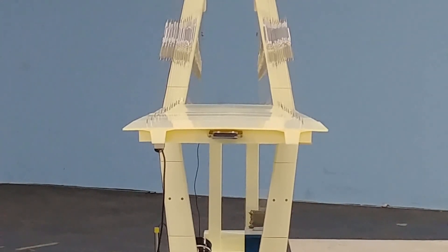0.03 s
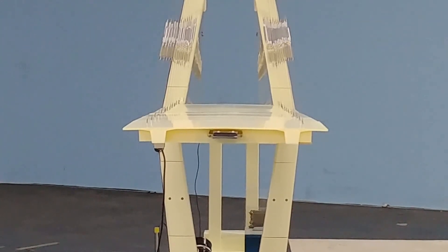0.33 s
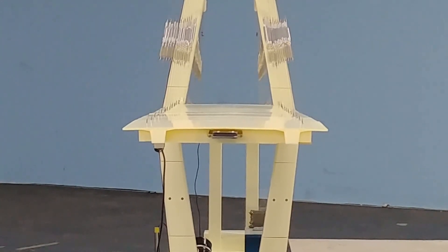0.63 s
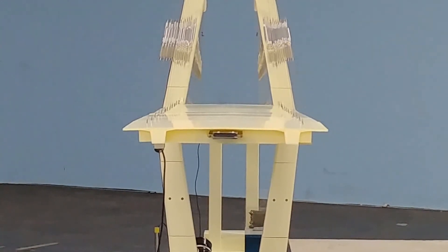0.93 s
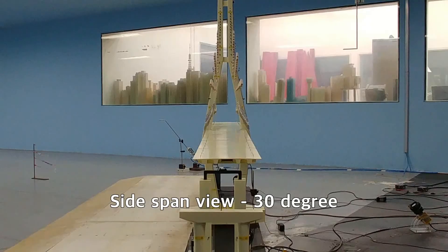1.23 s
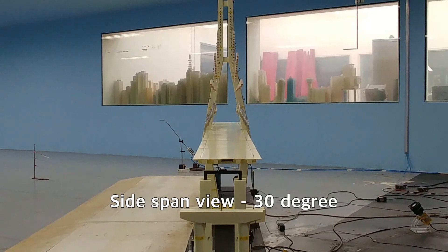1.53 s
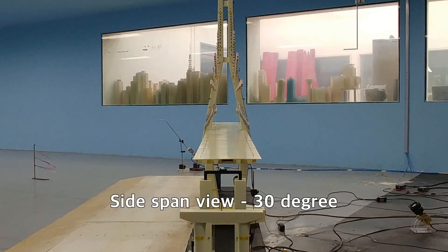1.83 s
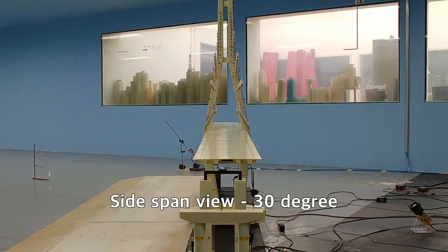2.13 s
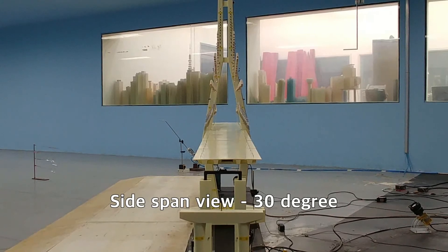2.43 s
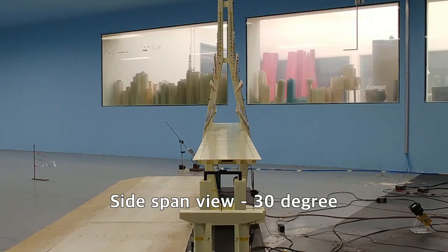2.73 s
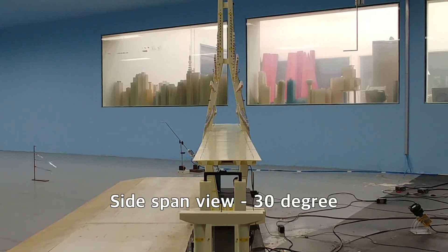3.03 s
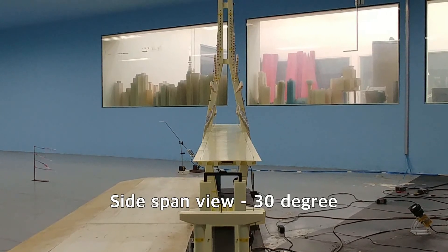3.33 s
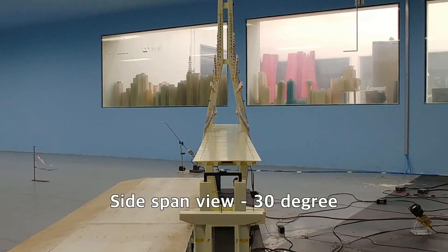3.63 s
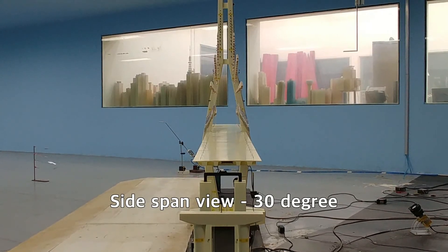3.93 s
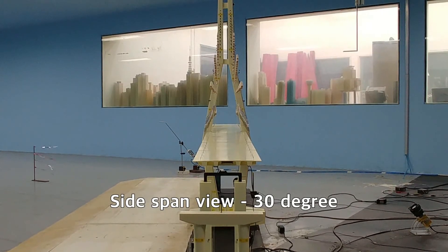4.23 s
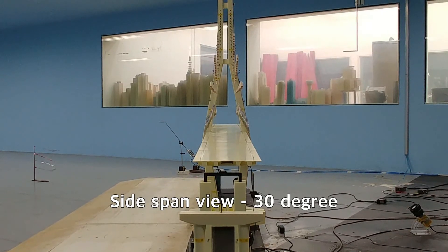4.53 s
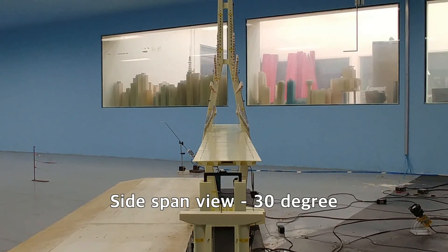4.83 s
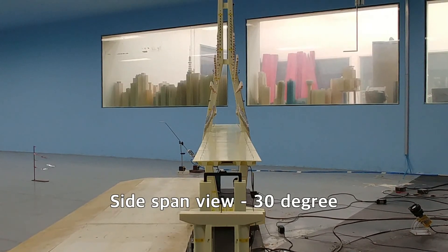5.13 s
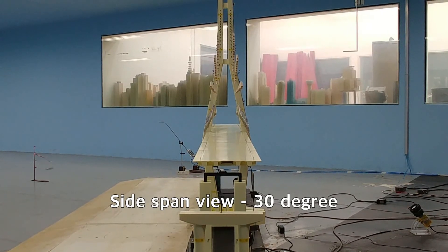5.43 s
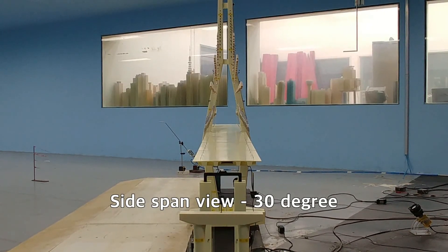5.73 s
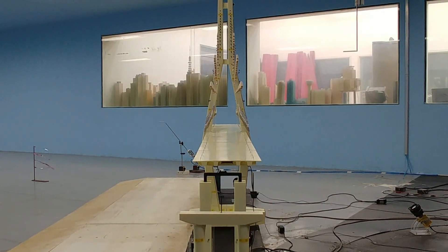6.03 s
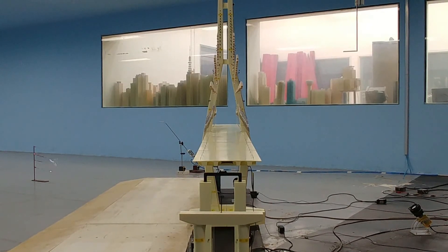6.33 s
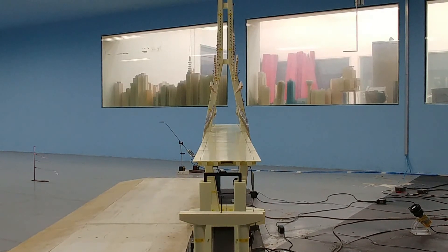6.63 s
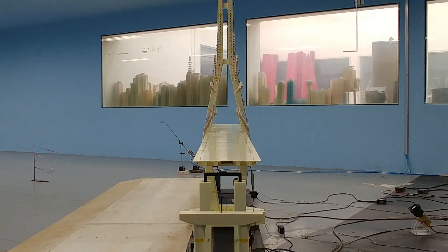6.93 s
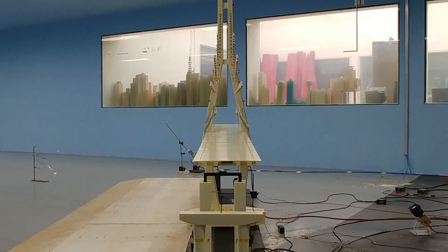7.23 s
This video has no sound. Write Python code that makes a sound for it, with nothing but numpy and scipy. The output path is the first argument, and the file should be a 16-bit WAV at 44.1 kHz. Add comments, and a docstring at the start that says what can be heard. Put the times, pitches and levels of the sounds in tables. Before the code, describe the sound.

Low, heavy airflow and pulsing fan tones fill a test room, break off with ticks, then return and run on steadily.

```python
"""A wind tunnel roars steadily in a large test room as swirling air rings its duct and hisses.
Two groups of fans hum at slightly different speeds, so their tones throb; the motor drive whines faintly.
A two-sided microphone listens from a first place, where the sound breaks off twice with a tick,
then fades in at a second place with the airflow arriving from the other side."""
import sys
import numpy as np
from scipy import signal
from scipy.fft import rfft, irfft
from scipy.io import wavfile
from scipy.ndimage import uniform_filter1d, minimum_filter1d

SR = 44100
rng = np.random.default_rng(int(sys.argv[2]) if len(sys.argv) > 2 else 0)


def waveform_to_disk(signal):
    """Save audio, clipped to [-1, 1], as 16-bit WAV at the path in sys.argv[1]."""
    frames = np.transpose(np.atleast_2d(signal))
    scaled = np.clip(frames, -1, 1) * 32767
    samples = np.round(scaled).astype(np.int16)
    wavfile.write(sys.argv[1], SR, samples)


N = 325899
TIME = np.arange(N) / SR
HZ = np.fft.rfftfreq(N, 1 / SR)

# roar of the swirling air: (frequency [Hz], relative level [dB])
ROAR = [(35, -66), (49, -49.5), (60, -36.5), (100, -33.5), (140, -34), (165, -37.5), (220, -38.5),
        (280, -41.5), (350, -43.5), (600, -47), (900, -50.5), (1250, -56), (1800, -60.5), (2300, -67),
        (2850, -71), (3400, -77.5)]
# tone of the high hiss, with a narrow gap near 10.8 kHz: (frequency [Hz], relative level [dB])
HISS = [(4700, -79.5), (5200, -79.5), (6100, -82), (6900, -90.5), (7700, -86), (8400, -91.5), (9000, -99.7),
        (10000, -103.2), (10800, -118.1), (13000, -107.1), (15500, -103.7)]
# notes at which the air in the duct and room rings: (frequency [Hz], width [Hz], lift [dB])
DUCT_RINGS = [(66.2, 2.5, 7.5), (183.7, 5, 5), (236, 14, 2), (304.8, 2, 7), (580, 30, 2.8), (820, 120, 1),
              (1850, 300, 1.5)]
# swells of the hiss: (time [s], half-length [s], lift of the hiss [dB], lift of its high fizz [dB])
HISS_SWELLS = [(1.89, .06, 3, 1.2), (2.84, .035, -1, 7), (3.11, .065, 1.5, 2.6), (3.35, .06, 1.7, 2.2),
               (3.61, .05, 0.5, 6), (3.87, .08, 1.3, 3), (4.81, .06, 2, .6), (6.11, .045, 2, .6),
               (6.2, .45, .6, 1.5)]
# sound that comes straight down the tunnel, not from all around: (frequency [Hz], share [0-1])
DIRECT_SHARE = [(60, 0.07), (300, .45), (700, 0.79), (1600, 0.25), (2500, 0.04), (6000, 0.1)]
# how alike the rest is on both sides, lowered by swirls at each: (frequency [Hz], likeness [0-1])
ROOM_LIKENESS = [(60, .76), (110, 0.66), (220, 1), (600, 0.7)]
# tones of each fan group: (multiple of the blade rate, base level at first place [dB], at second [dB])
FAST_FAN_TONES = [(1, -25.5, -24.6), (2, -23.5, -22.3), (4, -30.5, -23.1), (5, -23.5, -25.7),
                  (6, -36, -28.6), (7, -44, -41.5), (8, -42, -35.2), (9, -35, -33.8), (10, -32.5, -32),
                  (11, -44, -36.4), (12, -45, -34.8), (13, -44, -43.5), (14, -50, -41.2), (15, -49, -43)]
SLOW_FAN_TONES = [(4, -29, -25.5), (5, -26.5, -37.5), (6, -35, -30.2), (7, -37, -39.5), (12, -46, -46.1)]
# rise and fall of the drone, the fans' tone at four times the blade rate: (time [s], lift [dB])
DRONE_LIFT = [(1.6, 4), (2.3, -1.5), (2.8, 0.5), (3.1, -7.5), (3.58, -2), (3.82, -9), (4.2, -8.5),
              (4.4, 1.5), (4.9, -4), (5.15, 1), (5.5, 3), (5.8, 3.5), (6.1, 5.5), (6.28, -7), (6.5, 5.5),
              (6.9, -4.5), (7.15, 1.5), (7.35, -5)]
# whine of the motor drive and its two side tones: (frequency [Hz], base level [dB])
WHINE_TONES = [(4951, -72), (4984, -66.5), (5050, -74)]
# tone and left-right balance of the scene's two parts; the first one's hiss dips near 9 kHz:
# (frequency [Hz], lift in first [dB], left minus right in first [dB], left minus right in second [dB])
SHAPING = [(65, -1.3, 4.5, 1.2), (130, 0.4, 1.8, 0.7), (250, -1, 3.2, 1.6), (500, -0.1, 2.7, 1.2),
           (1000, 0.3, 3.2, 0.5), (1700, 0.2, 2.5, -1.0), (2900, 2.7, 3.5, 1.7), (4600, 4.2, 3.2, -0.5),
           (5900, 1.5, 0.6, -4.5), (7700, 6.7, 11.8, 4.0), (8400, 4.5, 10, 2.6), (9300, -8, 10, 0.8),
           (10000, 0, 9, 0.5)]
# stretches heard from the first place: (start [s], stop [s])
FIRST_SPANS = [(0, .9152), (1.0527, 1.1437)]
# brief swells of the deep rumble: (time [s], half-length [s], lift [dB])
RUMBLE_SWELLS = [(1.76, 0.04, 2.5), (2.28, 0.061, 3), (2.89, 0.043, 4), (6.23, 0.045, 1.5),
                 (6.89, 0.037, 2.5)]
# slow dips and swells of the roar's body, just above the rumble: (time [s], half-length [s], lift [dB])
BODY_SWELLS = [(3.2, .4, -0.4), (4.9, 0.49, 1.5), (6.5, 0.27, -1.2)]

RUMBLE_TO_HZ, RUSH_FROM_HZ, HISS_FROM_HZ = 115, 460, 2400
SECOND_START_S = 1.2858


def from_db(db):
    """Turn decibels into a number to multiply the sound by."""
    return 10 ** (np.asarray(db) / 20)


def curve(table, column=1):
    """Join the points of one table column into a value for every frequency."""
    rows = np.asarray(table, float)
    return np.interp(np.log(HZ + 1), np.log(rows[:, 0] + 1), rows[:, column])


def below(edge_hz, order=4):
    """A soft filter: how much of each frequency to keep so that mostly the lows remain."""
    return 1 / (1 + (HZ / edge_hz) ** order)


def drift(rate_hz):
    """A random wobble, about 1 in size, that moves mostly slower than rate_hz."""
    times = np.arange(0, TIME[-1] + 1, 1 / 200)
    hz = np.fft.rfftfreq(len(times), times[1])
    noise = rfft(rng.standard_normal(len(times))) * (hz > 0)
    slow = irfft(noise / (1 + (hz / rate_hz) ** 2), len(times))
    return np.interp(TIME, times, slow / slow.std())


def swells(table, column=2):
    """A level in dB with one smooth bump or dip for each table row."""
    return sum(row[column] * np.exp(-((TIME - row[0]) / row[1]) ** 2) for row in table)


def air_noise(lead_ms, spacing_m=0.15, sound_m_per_s=343):
    """Left and right noise spectra: part reaches the left lead_ms early, part comes from all around."""
    left, unrelated = (rfft(rng.standard_normal(N)) * np.sqrt(SR / 2) for _ in range(2))
    direct = np.clip(curve(DIRECT_SHARE), 0, 1)
    room = np.clip(curve(ROOM_LIKENESS), 0, 1) * np.sinc(2 * HZ * spacing_m / sound_m_per_s)
    delay = np.exp(-2j * np.pi * HZ * lead_ms / 1000)
    alike = direct * delay + (1 - direct) * room
    right = alike * left + np.sqrt(np.maximum(1 - abs(alike) ** 2, 0)) * unrelated
    return np.array([left, right])


def airflow(lead_ms):
    """Swirling air roars and rings the duct; its hiss flutters and swells now and then."""
    colour = from_db(curve(list(ROAR) + list(HISS)))
    for ring_hz, width_hz, lift_db in DUCT_RINGS:
        peak = 1 / (1 + (2 * (HZ - ring_hz) / width_hz) ** 2)
        colour *= np.sqrt(1 + (from_db(lift_db) ** 2 - 1) * peak)
    air = air_noise(lead_ms) * colour
    low = below(HISS_FROM_HZ)
    high = np.exp(-((HZ - 7800) / 900) ** 2)
    roar, hiss, fizz = (irfft(air * band, N) for band in (low, 1 - low - high, high))
    swirls = drift(12)
    hiss_db = swells(HISS_SWELLS, column=2) + 0.94 * swirls
    fizz_db = swells(HISS_SWELLS, column=3) + 0.8 * swirls
    return roar + hiss * from_db(hiss_db) + fizz * from_db(fizz_db)


def opening_gust(air, lift_db=3, fade_s=0.42, top_hz=500):
    """A gust lifts the low roar at the start and dies away."""
    gain = from_db(lift_db * np.exp(-(TIME / fade_s) ** 2))
    low_roar = irfft(rfft(air) * below(top_hz), N)
    return air + (gain - 1) * low_roar


def wavering_tone(cycles, level_db, scatter):
    """A tone heard through moving air: a steady part plus a wavering echo, a bit different on each side."""
    echo = drift(1.8) + 1j * drift(1.4)
    sides = np.array([drift(0.51), drift(1)])
    steady = np.exp(2j * np.pi * (cycles + rng.random()))
    wave = (steady * (1 + scatter * (echo + 0.5j * sides))).real
    return from_db(level_db) * wave / wave.std()


def fan_group(blade_hz, tones, place):
    """Passing blades make a stack of tones; moving air makes the high ones waver most."""
    cycles = np.cumsum(blade_hz * (1 + 0.00066 * drift(0.46))) / SR
    drone_db = np.interp(TIME, *np.transpose(DRONE_LIFT))
    hum = 0
    for multiple, base_db in np.array(tones)[:, [0, place]]:
        level_db = base_db + drone_db * (multiple == 4)
        hum += wavering_tone(multiple * cycles, level_db, scatter=0.21 + 0.027 * multiple)
    return hum


def fan_hum(place, lead_ms):
    """Two fan groups throb against each other at place 1 or 2; the left hears them lead_ms early."""
    fast = fan_group(blade_hz=56.45, tones=FAST_FAN_TONES, place=place)
    slow = fan_group(blade_hz=55.05, tones=SLOW_FAN_TONES, place=place)
    half_lead = 1j * np.pi * HZ * lead_ms / 1000
    return irfft(rfft(fast + slow) * np.exp([half_lead, -half_lead]), N)


def drive_whine():
    """The motor drive switches its current very fast, which makes a thin whine."""
    return sum(wavering_tone(hz * TIME, level_db, scatter=0.59) for hz, level_db in WHINE_TONES)


def shaped(sound, lift_db, balance_db):
    """Set the sound's tone and left-right balance, frequency by frequency."""
    sides_db = np.array([balance_db, -balance_db]) / 2
    return irfft(rfft(sound) * from_db(lift_db + sides_db), N)


def ticks(times, peak_db, decay_s=0.00048):
    """Each tick is a sudden jump that dies within a millisecond or two."""
    return from_db(peak_db) * sum((TIME >= at) * np.exp(-abs(TIME - at) / decay_s) for at in times)


def breaks(sound, smear_db=-32, smear_s=0.05, smear_top_hz=1900):
    """The sound cuts out and in with ticks; a faint, dull smear of noise is heard just after each break."""
    on = sum(1.0 * (TIME >= start) * (TIME < stop) for start, stop in FIRST_SPANS)
    gain = np.minimum(TIME / 0.004, 1) * uniform_filter1d(on, size=16)  # soften the edges
    smear_gain = sum((TIME >= stop) * from_db(smear_db - 60 * abs(TIME - stop) / smear_s)
                     for _, stop in FIRST_SPANS)
    smear = irfft(rfft(sound) * below(smear_top_hz, order=2), N)
    tick_times = [at for span in FIRST_SPANS for at in span if at > 0]
    return sound * gain + smear * smear_gain + ticks(tick_times, peak_db=-8.7)


def fade_in(sound, fade_s=0.41, left_db=-12, right_db=-29):
    """The second part opens with a small tick on the left, then eases up to full level."""
    left_tick = np.outer([1, 0], ticks([SECOND_START_S], peak_db=-12))  # the fade lowers it further
    since_s = TIME - SECOND_START_S
    remaining = np.clip(1 - since_s / fade_s, 0, 1) ** 1.63
    gain = from_db(np.outer([left_db, right_db], remaining)) * (since_s >= 0)
    return (sound + left_tick) * gain


def build_up(start_db, full_at_s, rise_s):
    """A level in dB that stays a little low, then climbs evenly to zero."""
    return start_db * np.clip((full_at_s - TIME) / rise_s, 0, 1)


def surges(sound):
    """Four bands, low to high: the rumble builds and swells, the body ebbs and swells,
    and the rush and hiss build and waver."""
    rumble = below(RUMBLE_TO_HZ, order=8)
    upper = 1 - below(RUSH_FROM_HZ)
    hiss = 1 - below(HISS_FROM_HZ)
    body, rush = 1 - rumble - upper, upper - hiss
    rumble_db = build_up(-2.5, full_at_s=1.6, rise_s=0.12) + build_up(-3, full_at_s=2.26, rise_s=0.08)
    rumble_db += swells(RUMBLE_SWELLS)
    rush_db = build_up(-1.5, full_at_s=3, rise_s=0.61) + 0.35 * drift(5.9)
    hiss_db = rush_db + build_up(-1, full_at_s=1.54, rise_s=0.06)
    bands = (rumble, rumble_db), (body, swells(BODY_SWELLS)), (rush, rush_db), (hiss, hiss_db)
    spectrum = rfft(sound)
    return sum(from_db(level_db) * irfft(spectrum * band, N) for band, level_db in bands)


def scene():
    """The same airflow, fans and whine, heard from one place and then from another."""
    whine = drive_whine()
    air = from_db(-1.0) * opening_gust(airflow(lead_ms=0.39))
    hum = fan_hum(place=1, lead_ms=0.26)
    first = shaped(air + hum + whine, lift_db=curve(SHAPING), balance_db=curve(SHAPING, column=2))
    air = from_db(-0.65) * airflow(lead_ms=-0.37)  # a negative lead: the right side hears it first
    hum = from_db(-0.4) * fan_hum(place=2, lead_ms=-0.42)
    second = shaped(surges(air + hum + whine), lift_db=0, balance_db=curve(SHAPING, column=3))
    return breaks(first) + fade_in(second)


def record(dry):
    """Turn down any peaks above full scale for a moment, then remove the very highest treble."""
    needed_gain = 1 / np.maximum(abs(dry).max(axis=0), 1)
    smooth_gain = uniform_filter1d(minimum_filter1d(needed_gain, size=301), size=301)
    low_pass = signal.firwin(511, cutoff=15900, window=("kaiser", 9), fs=SR)
    return signal.oaconvolve(dry * smooth_gain, low_pass[None], "same")


dry = scene()
out = record(dry)
waveform_to_disk(out)
```